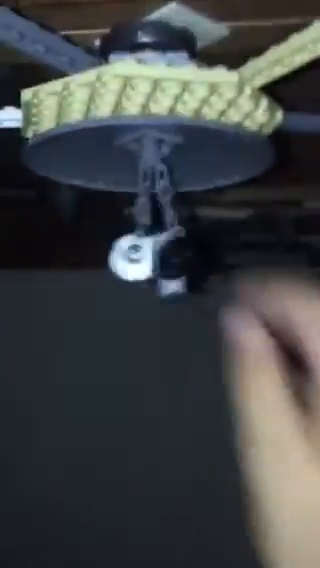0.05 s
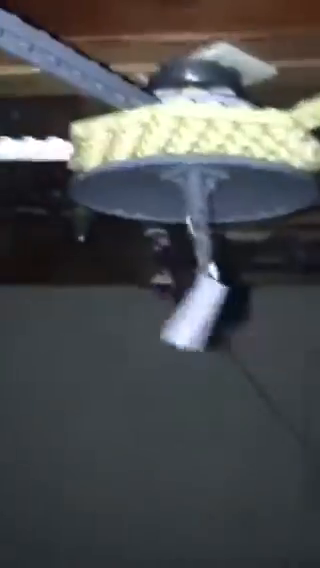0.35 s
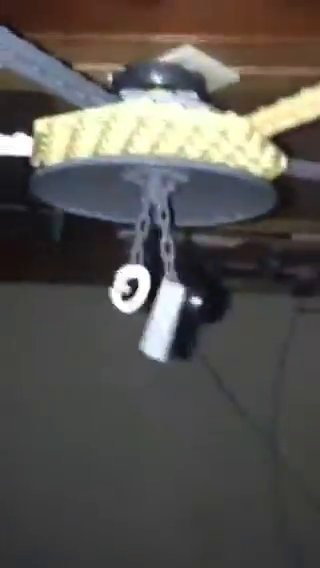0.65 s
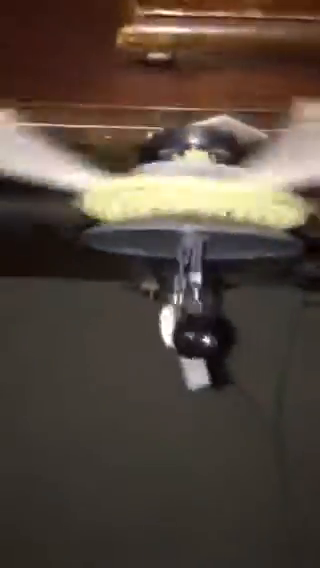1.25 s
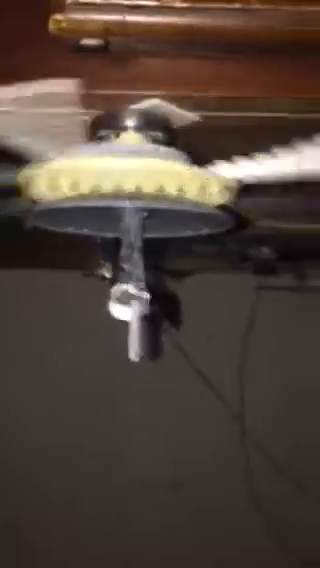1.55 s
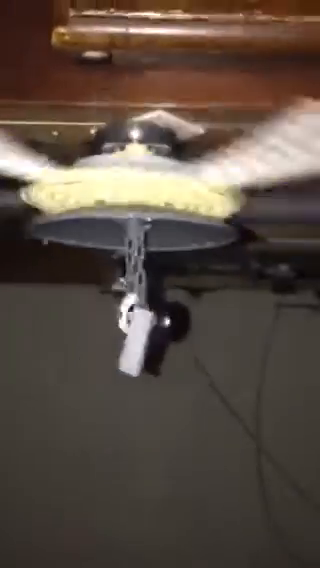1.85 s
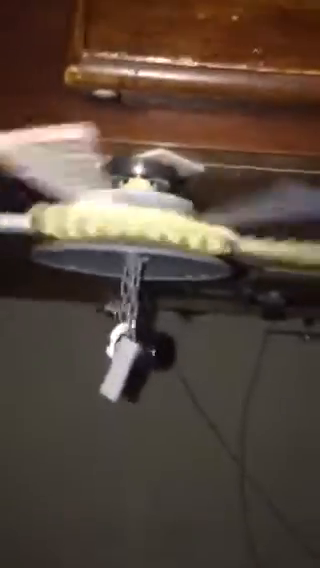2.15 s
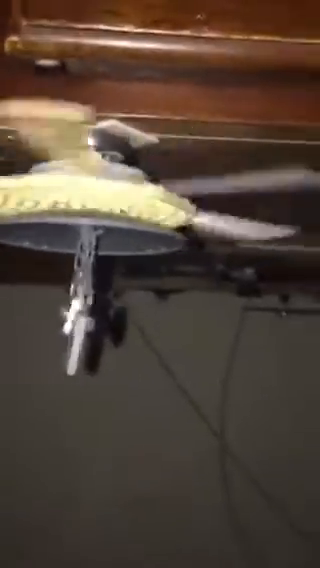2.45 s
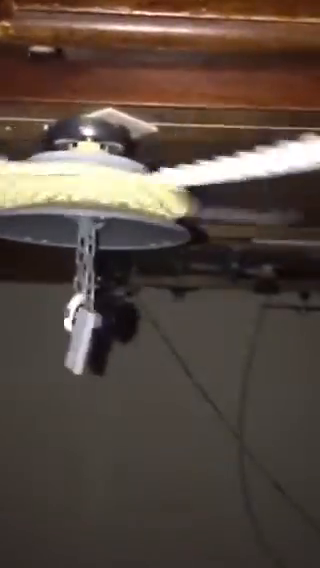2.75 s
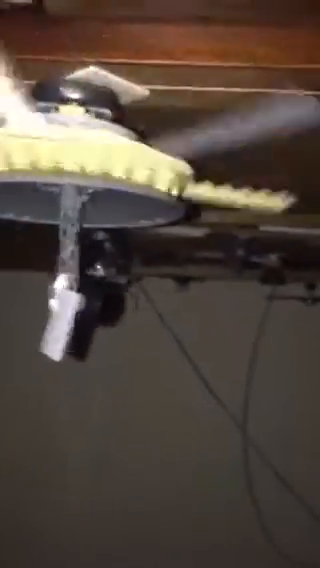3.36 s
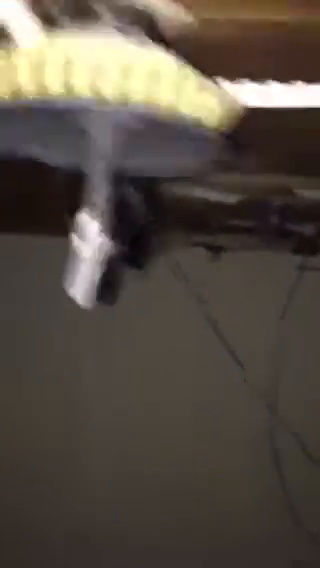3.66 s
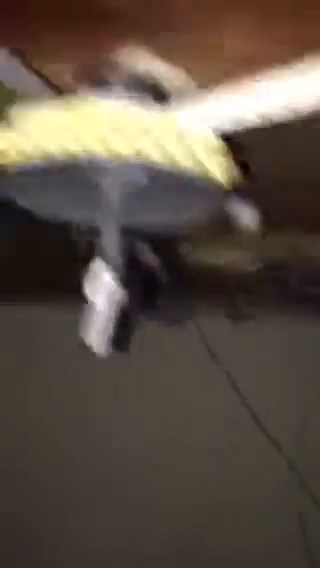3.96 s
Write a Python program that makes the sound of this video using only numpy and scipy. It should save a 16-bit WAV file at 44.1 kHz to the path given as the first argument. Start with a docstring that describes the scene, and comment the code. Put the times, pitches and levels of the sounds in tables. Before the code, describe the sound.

A ceiling fan jolts into a loud, rough rattle after a few light pull chain clicks. Its metallic knocks and scrapes gradually slow in a small quiet room, with a few low bumps on the hand-held microphone.

```python
"""Light clicks come first: a pull chain is let go and its pendants collide. Then a ceiling fan starts with a
jolt, its rotor rubbing the housing, knocking and scraping ever more slowly over a rough grind. Impacts and
stick-slip friction excite the resonances of the contact point, the housing and the mount. A small quiet room
reflects the sound; a hand letting go of the chain and a few bumps on the hand-held microphone add low thuds."""
import sys
import numpy as np
from scipy import signal
from scipy.io import wavfile
from scipy.ndimage import uniform_filter1d

SR = 44100
rng = np.random.default_rng(int(sys.argv[2]) if len(sys.argv) > 2 else 0)


def inscribe(sig):
    """Save sig as 16-bit PCM at rate SR to the path in sys.argv[1].

    A 1-D sig is mono; a 2-D sig holds one channel per row.
    Samples are clipped to [-1, 1] before scaling.
    """
    pcm = np.round(np.clip(np.atleast_2d(sig).T, -1, 1) * 32767)
    wavfile.write(sys.argv[1], SR, pcm.astype(np.int16))


N = 176400
T = np.arange(N) / SR

# Rotor catching on the housing (time [s], relative levels of knock [dB], scrape [dB], housing [dB])
ROTOR_RUBS = [(0.866, -20.5, -24, -37), (0.883, -18, -24.5, -32), (0.913, -16.5, -17.5, -43),
              (0.966, -19, -23.5, -49), (1.076, -16.5, -33.5, -44), (1.133, -23.5, -35, -45),
              (1.19, -25, -24, -42), (1.252, -21.5, -32, -54), (1.315, -13.5, -28, -37.5),
              (1.378, -34, -23, -45.5), (1.446, -20.5, -28.5, -43), (1.512, -18.5, -28.5, -45.5),
              (1.583, -21, -36, -48), (1.653, -19, -32, -44.5), (1.729, -25.5, -36.5, -50),
              (1.81, -26.5, -33, -47), (1.882, -23.5, -26.5, -40.5), (1.965, -18.5, -19, -38.5),
              (2.052, -20.5, -25.5, -38.5), (2.142, -21, -23.5, -40.5), (2.239, -33, -27, -48),
              (2.297, -31, -27, -56), (2.34, -27, -24, -39.5), (2.394, -43, -34, -46),
              (2.452, -21, -28.5, -42), (2.569, -20.5, -24, -36.5), (2.699, -22, -27.5, -40.5),
              (2.863, -28, -31.5, -43), (2.988, -31.5, -30, -38), (3.158, -33, -29.5, -42.5),
              (3.356, -14.5, -23, -39), (3.59, -22, -29, -41.5), (3.903, -23.5, -29.5, -41.5)]
# Bare clacks of the rotor, without scraping (time [s], relative level [dB])
ROTOR_CLACKS = [(.859, -19.5), (.875, -22), (.924, -15), (.975, -16.5), (1.022, -19), (1.256, -21),
                (1.382, -18.5), (1.664, -20.5), (1.921, -19.5), (1.976, -15.5), (2.068, -21.5),
                (2.27, -25), (2.353, -23.5), (2.84, -27), (3.372, -19), (3.633, -30)]
# Light, dull grazes between the catches (time [s], level [dB])
ROTOR_GRAZES = [(1.824, -46), (2.954, -50), (3.177, -43.5), (3.262, -47), (3.306, -44.5), (3.489, -50),
                (3.799, -49.5)]
# Grind between the knocks (time [s], contact level [dB], housing level [dB])
GRIND_LEVELS = [(.87, -41.5, -47.5), (1.2, -47.5, -50.5), (1.8, -54, -54.5), (2.4, -52, -50.5),
                (2.8, -59, -54), (3.1, -60.5, -67.5), (4, -63, -65.5)]
# Spectra of the contact point, its sharp snaps and the housing (frequency [Hz], relative level [dB])
CONTACT_SPECTRUM = [(100, -46.5), (1500, -3.5), (2600, -8.5), (2900, 4), (3500, 1), (4000, -11),
                    (5300, -8.5), (5900, -19), (16000, -64.5)]
SNAP_SPECTRUM = [(500, -35), (3000, -17.5), (4600, 8.5), (7000, -1.5), (9500, -8.5), (11000, -22.5),
                 (16000, -18)]
HOUSING_SPECTRUM = [(60, -35.5), (200, -7), (720, -9.5), (900, 4), (1550, 3.5), (2100, -4), (2400, 4),
                    (3500, 0.5), (5000, -14.5), (16000, -89.5)]
# Normal modes of the housing and of the ceiling mount (frequency [Hz], relative level [dB])
HOUSING_MODES = [(902, -4.5), (1025, -8), (1260, -12), (1525, -10), (1585, -19), (1908, -7.5), (2390, -9)]
MOUNT_MODES = [(188, -8.5), (263, -5), (536, -9.5), (604, -4)]
# Collisions of the chain and pendants (time [s], relative level [dB])
PENDANT_CLICKS = [(0.028, -34), (0.0715, -32.5), (0.138, -38), (0.2605, -35.5), (0.2683, -32.5),
                  (0.4075, -43), (0.5422, -23), (0.5692, -30.5), (0.6849, -36)]
# Response of a struck pendant (frequency [Hz], relative level [dB])
PENDANT_SPECTRUM = [(100, -55), (2000, -25), (2400, -5.5), (2650, -13), (2950, 6.5), (3800, -13),
                    (4300, -15.5), (5100, -12), (6100, -26.5), (16000, -36)]
# Chain sliding through the fingers (time [s], level [dB])
CHAIN_SLIDE = [(0, -64.5), (.08, -52), (.18, -74), (.245, -58.5), (.4, -100)]
# Dull thuds and taps: a hand lets go of the chain, later the microphone is bumped (time [s], thud level [dB],
# final pitch [Hz], rise [s], tap level [dB], tap band [Hz])
THUDS = [(.098, -60, 79, 0.0089, -49, 436), (0.251, -51.5, 55.5, 0.021, -55, 444),
         (2.444, -32, 74.6, 0.022, -50.5, 221), (2.589, -33.5, 71.5, 0.014, -58, 200),
         (2.824, -32, 59, 0.014, -63, 180), (2.877, -33.5, 83.6, 0.014, -74, 200),
         (3.437, -31, 60.3, .013, -39, 258), (3.753, -34.5, 85.6, 0.015, -41, 1510),
         (3.773, -30.5, 50, 0.014, -50, 200)]
# Decay of the room (frequency [Hz], reverberation time [s])
REVERB_TIMES = [(100, 0.11), (600, 0.55), (3000, 0.34), (8000, 0.22)]
# Spectra of the room air and the rumble (frequency [Hz], relative level [dB])
AIR_SPECTRUM = [(15, -40.5), (28, 5.5), (71, -1.5), (2010, -16), (3000, -17.5), (15500, -30.5)]
RUMBLE_SPECTRUM = [(25, -16.5), (60, 11), (120, -10.5), (2000, -59)]
# Swells of the rumble (time [s], level [dB])
RUMBLE_LEVELS = [(.85, -89), (1.1, -64.5), (2.2, -62.5), (2.7, -52), (3.2, -69.5), (4, -53.5)]

START_S, START_RISE_S = .858, .013
SLIPS_PER_S, CHATTER_PER_S, GRIND_PER_S = 900, 480, 700
KNOCK_DB, SCRAPE_DB, HOUSING_DB = -4.5, -11.5, -3.5


def fan():
    """Forced vibration: impacts and friction of the rotor drive the contact point, housing and mount."""
    strikes = [(s, db + KNOCK_DB) for s, db, *_ in ROTOR_RUBS + ROTOR_CLACKS]
    impacts = amp(1) * impulses(strikes)
    scraping = bursts([(s, db + SCRAPE_DB) for s, _, db, _ in ROTOR_RUBS], rise_s=.0023, fall_s=.015)
    pressing = bursts([(s, db + HOUSING_DB) for s, _, _, db in ROTOR_RUBS], rise_s=.0031, fall_s=.038)
    running = np.clip((T - START_S) / START_RISE_S, 0, 1)
    grind = running * slips(GRIND_PER_S)
    contact = knocks(strikes) + scrape(scraping, running) + snaps(impacts, scraping)
    return contact + housing(impacts, pressing, grind) + mount(grind)


def knocks(strikes, pitch_hz=3202, rise_s=.00057):
    """Impact excitation: each strike sets off a heavily damped metallic tone of slightly varied pitch."""
    out, t = np.zeros(N), T[:SR // 10]
    envelope = t / rise_s * np.exp(1 - t / rise_s)
    for s, db in strikes:
        hz = pitch_hz * (1 + .072 * rng.uniform(-1.08, 1))
        add(out, s, amp(db) * envelope * np.sin(2 * np.pi * hz * t))
    return out


def scrape(scraping, running):
    """Stick-slip friction: bursts of slips and a continuous chatter ring the bright contact point."""
    chatter = running * level(GRIND_LEVELS, column=1) * waver(depth_db=3) * slips(CHATTER_PER_S)
    force = scraping * slips(SLIPS_PER_S) + chatter
    return through(moving_resonance(force, hz=3200, width_hz=162, swing=.072), colour(CONTACT_SPECTRUM))


def snaps(impacts, scraping, db_per_s=-5):
    """Abrupt forces are rich in treble: knocks and sparse slips snap, softening as the rubbing slows."""
    force = amp(-8) * impacts + amp(-12.5) * scraping * slips(per_s=140)
    return through(force * amp(db_per_s * (T - START_S)), colour(SNAP_SPECTRUM))


def housing(impacts, pressing, grind):
    """Shell radiation: knocks and rubs excite a broad response and ringing modes; grazes add dull noise."""
    steady_rub = level(GRIND_LEVELS, column=2) * waver(depth_db=3) * grind
    force = impacts + pressing * slips(SLIPS_PER_S) + steady_rub
    grazes = bursts(ROTOR_GRAZES, rise_s=.005, fall_s=.014) * slips(SLIPS_PER_S)
    shell = through(force, colour(HOUSING_SPECTRUM)) + band(grazes, hz=1410, span=1.274)
    shell = moving_resonance(shell, hz=1437, width_hz=192, swing=.23)
    return shell + amp(-9.5) * ring(force, HOUSING_MODES)


def mount(grind):
    """Structure-borne sound: the grind drives the low modes of the ceiling mount into a drone."""
    force = level(GRIND_LEVELS, column=2) ** .71 * grind  # fades less than the grind in the housing
    return amp(-20.5) * ring(force, MOUNT_MODES)


def moving_resonance(x, hz, width_hz, swing, gain_db=6.5):
    """A resonance shifts as the point of contact travels; swing is the rms drift of its log frequency."""
    frequency = hz * np.exp(swing * drift(span_s=.016))
    carrier = np.exp(2j * np.pi * np.cumsum(frequency) / SR)
    pole, gain = np.exp(-np.pi * width_hz / SR), amp(gain_db)
    resonance = 2 * (carrier * signal.lfilter([1 - pole], [1, -pole], x / carrier)).real
    return (x + gain * resonance) / np.sqrt(1 + gain)


def ring(x, modes, t60_s=.12):
    """Modal superposition: each damped mode is driven more or less strongly as the contact moves."""
    out, t = np.zeros(N), T[:SR // 2]
    decay = amp(-60 * t / t60_s)
    for hz, db in modes:
        out += amp(db) * through(x * waver(depth_db=3.5), unit(decay * np.sin(2 * np.pi * hz * t)))
    return out


def pull_chain(buzz_s=.0032, ping_s=.265, ping_hz=13600, ping_width_hz=420):
    """Free vibration after impact: pendants click and buzz, and one link pings, as the chain slides free."""
    buzz, ping = np.zeros((2, N))
    pendant, t = colour(PENDANT_SPECTRUM), T[:SR // 10]
    hits = amp(-10.5) * impulses(PENDANT_CLICKS) / abs(pendant).max()
    for s, db in PENDANT_CLICKS:
        add(buzz, s, amp(db - 10) * np.exp(-t / buzz_s))
    add(ping, ping_s, amp(-38) * np.sin(2 * np.pi * ping_hz * t) * np.exp(-np.pi * ping_width_hz * t))
    slide, rattle = level(CHAIN_SLIDE), slips(per_s=1800)
    rustle = amp(-8) * band(slide * rattle, hz=800, span=2.6)  # links on skin
    return through(hits + (buzz + slide) * rattle, pendant) + rustle + ping


def thuds_and_taps(glide_s=.0043, tap_fall_s=.006):
    """Thuds and taps: each gives a tap and a rough low thud that sinks in pitch; first a hand lets go of the
    chain, later the microphone is bumped."""
    out, t = np.zeros(N), T[:SR // 10]
    for s, db, hz, rise_s, tap_db, tap_hz in THUDS:
        cycles = np.cumsum(hz * (1 + 2.24 * np.exp(-t / glide_s))) / SR
        roughness = waver(depth_db=2, span_s=.0045)[:len(t)]
        envelope = t / rise_s * np.exp((1 - (t / rise_s) ** 2) / 2)
        add(out, s, -amp(db) * roughness * envelope * np.sin(2 * np.pi * cycles))
        tap = amp(tap_db) * np.exp(-t / tap_fall_s) * rng.standard_normal(len(t))
        add(out, s, band(tap, tap_hz, span=1.55))
    return out


def room(x, tail_db, early_db=-6, early_fall_s=.0034):
    """Reverberation: quick ceiling reflections and a short diffuse tail follow the direct sound."""
    t = T[:SR // 2]
    noise, sparse = rng.standard_normal((2, len(t))), rng.random(len(t)) < .04
    early = unit(noise[0] * sparse * (t > .0015) * np.exp(-t / early_fall_s))
    hz, s, spectrum = signal.stft(noise[1] * (t > .005), SR, nperseg=256)
    decay = amp(-60 * s / read(REVERB_TIMES, hz)[:, None])
    tail = unit(signal.istft(spectrum * decay, SR, nperseg=256)[1])
    return x + amp(early_db) * through(x, early) + amp(tail_db) * through(x, tail)


def background():
    """Ambient noise: quiet room air, and a low rumble that swells and sinks once the fan runs."""
    air = through(rng.standard_normal(N), colour(AIR_SPECTRUM))
    rumble = through(rng.standard_normal(N), colour(RUMBLE_SPECTRUM))
    return amp(-70) * air + level(RUMBLE_LEVELS) * rumble


def slips(per_s, spread_db=5.5):
    """Stick-slip motion as irregular impulses of uneven size, rms 1."""
    pace = rng.exponential(1, N // 32 + 1).repeat(32)[:N]
    slipping = np.diff(np.floor(np.cumsum(pace) * per_s / SR), prepend=0) > 0
    size = amp(spread_db * np.clip(rng.standard_normal(N), -2, 2)) * rng.choice([-1, 1], N)
    return unit(slipping * size) * np.sqrt(N)


def impulses(events):
    """Ideal impacts: one single-sample pulse for each (time [s], level [dB])."""
    out = np.zeros(N)
    for s, db in events:
        add(out, s, amp([db]))
    return out


def bursts(events, rise_s, fall_s, release_at_s=.0078):
    """Contact envelopes: a linear rise, brief hold and exponential decay per (time [s], level [dB])."""
    t = T[:SR // 4]
    envelope = np.minimum(t / rise_s, 1) * np.exp(-np.maximum(t - release_at_s, 0) / fall_s)
    return through(impulses(events), envelope)


def waver(depth_db, span_s=.028):
    """Amplitude modulation by a smooth random gain."""
    return amp(depth_db * drift(span_s))


def drift(span_s):
    """Smooth random motion from twice-averaged noise, rms 1."""
    width = int(span_s * SR)
    return unit(uniform_filter1d(uniform_filter1d(rng.standard_normal(N), width), width)) * np.sqrt(N)


def band(x, hz, span):
    """Band-pass from hz / span to hz * span that preserves the power of white noise."""
    sos = signal.butter(2, [hz / span, hz * span], "band", fs=SR, output="sos")
    return through(x, unit(signal.sosfilt(sos, signal.unit_impulse(SR // 10))))


def colour(points, size=4096):
    """Minimum-phase impulse response of a spectrum, energy 1."""
    log_gain = np.log(amp(read(points, abs(np.fft.fftfreq(size, 1 / SR)))))
    spectrum = np.exp(np.conj(signal.hilbert(log_gain)))
    return unit(np.fft.ifft(spectrum).real[:size // 2])


def through(x, response):
    """Convolution with an impulse response."""
    return signal.oaconvolve(x, response)[:N]


def add(mix, s, sound):
    """Superposition of a sound on the mix at time s."""
    part = mix[round(s * SR):][:len(sound)]
    part += sound[:len(part)]


def level(rows, column=1):
    """Gain over time, interpolated in decibels."""
    rows = np.array(rows)
    return amp(np.interp(T, rows[:, 0], rows[:, column]))


def read(points, hz):
    """Interpolation on a log-frequency axis."""
    f, value = np.transpose(points)
    return np.interp(np.log(hz + 1), np.log(f + 1), value)


def unit(x):
    """Normalisation to energy 1."""
    return x / np.sqrt(np.sum(x ** 2) + 1e-20)


def amp(db):
    """Amplitude ratio of a level in decibels."""
    return 10 ** (np.asarray(db) / 20)


def scene():
    """Superposition of the fan and chain in the room, the thuds and taps, and the ambient noise."""
    sources = room(fan(), tail_db=-12.5) + room(pull_chain(), tail_db=-15)
    return (sources + thuds_and_taps() + background())[None]


def record(dry, low_hz=32, high_hz=15800):
    """Band limiting: a gentle low cut and a steep treble cutoff."""
    dry = signal.sosfilt(signal.butter(2, low_hz, "high", fs=SR, output="sos"), dry)
    return signal.oaconvolve(dry, signal.firwin(511, high_hz, window=("kaiser", 9), fs=SR)[None], "same")


dry = scene()
out = record(dry)
inscribe(out)
```